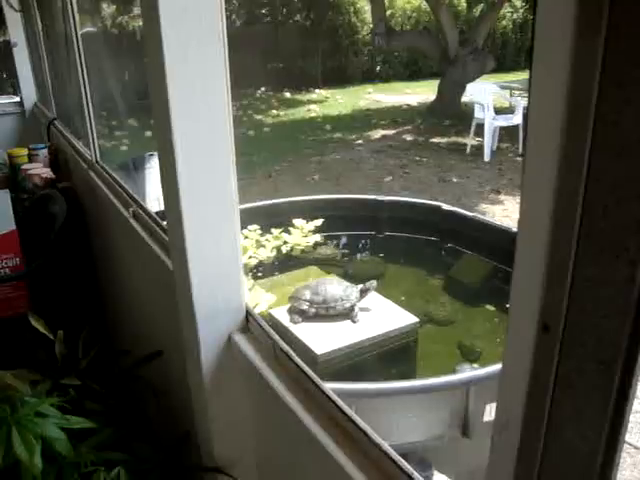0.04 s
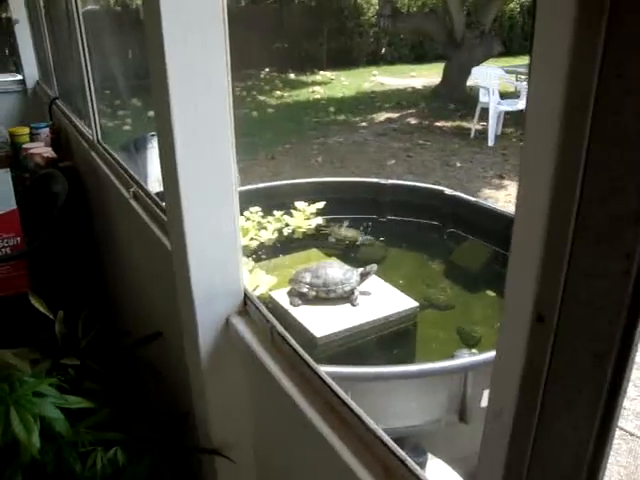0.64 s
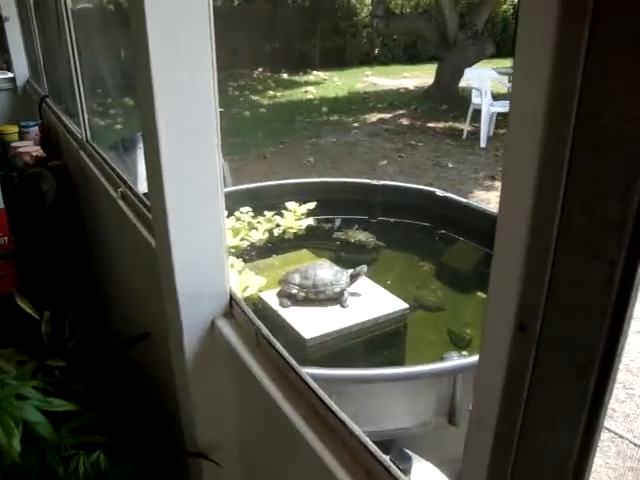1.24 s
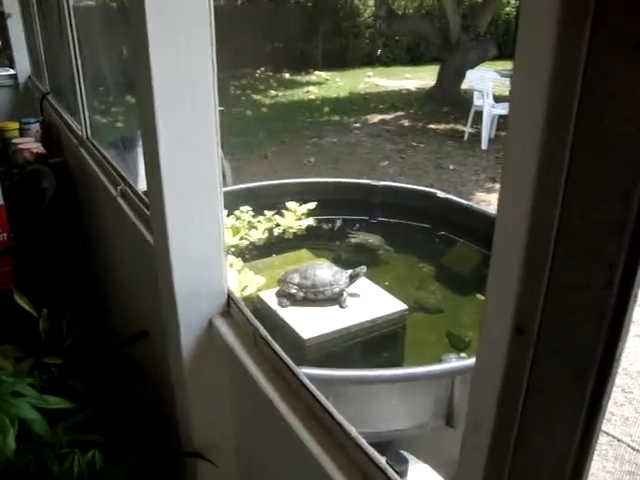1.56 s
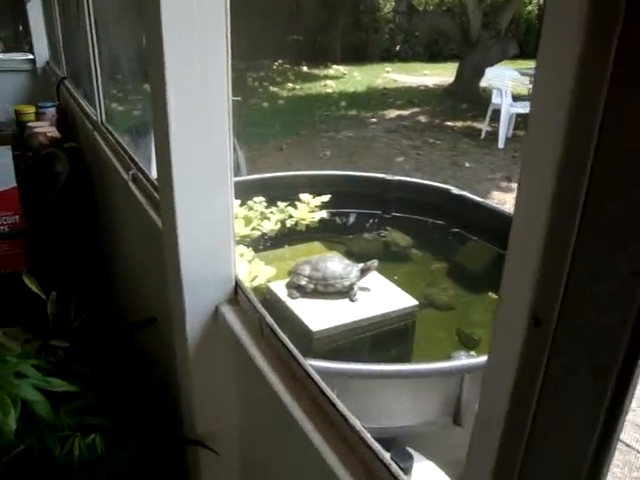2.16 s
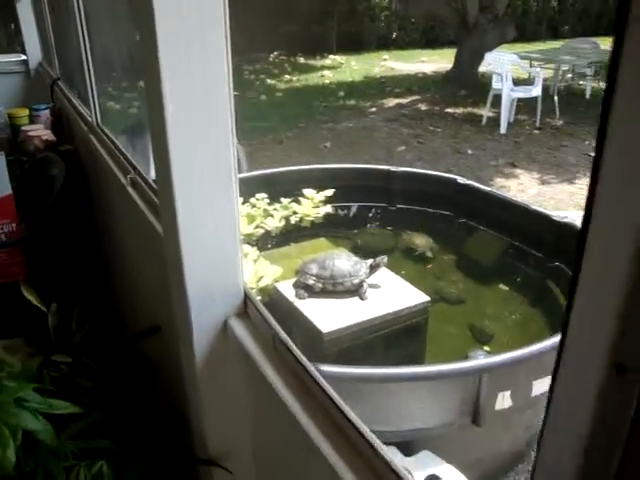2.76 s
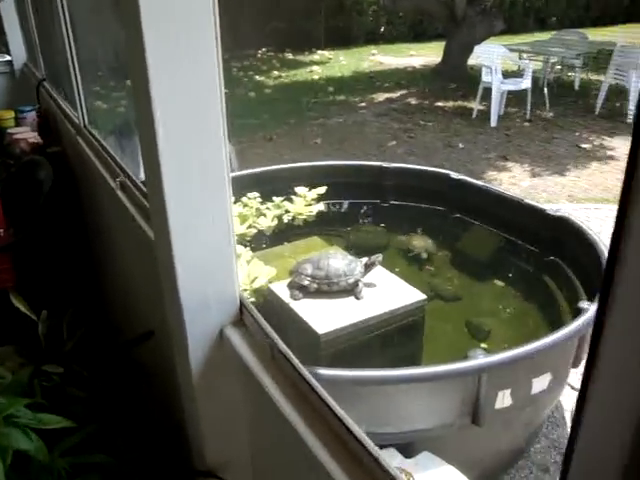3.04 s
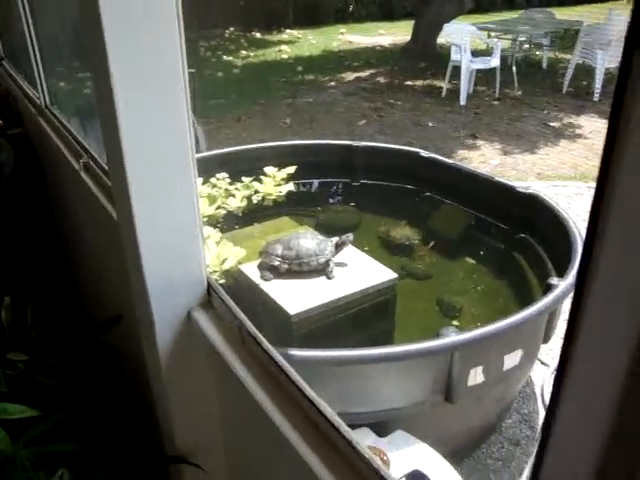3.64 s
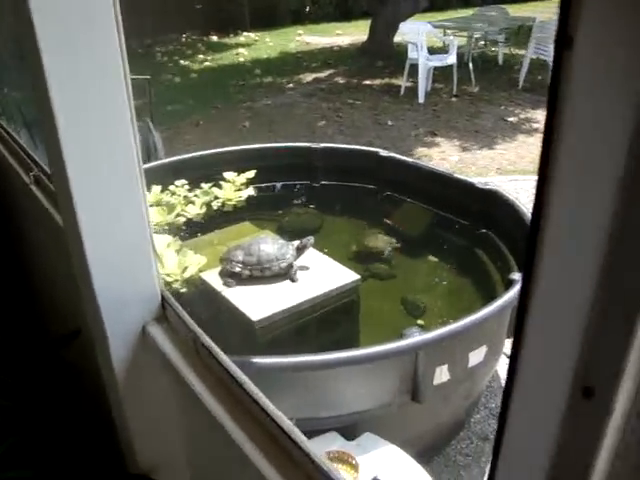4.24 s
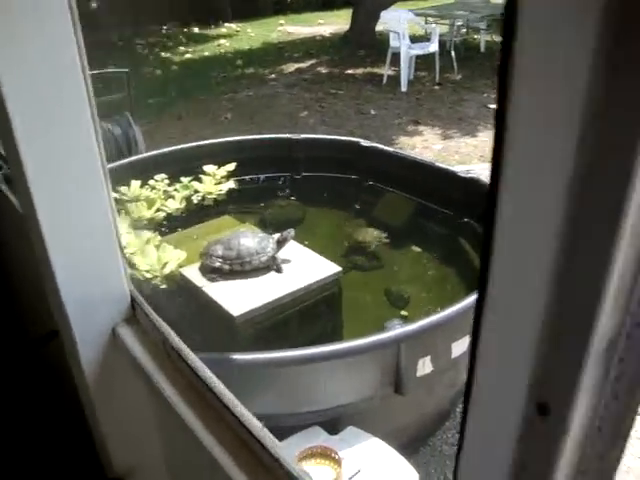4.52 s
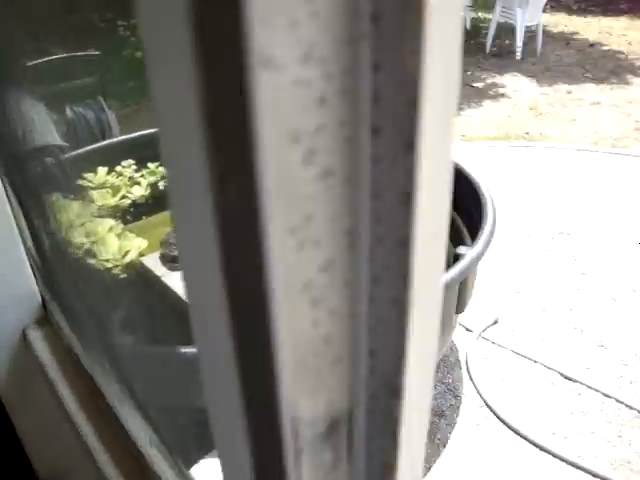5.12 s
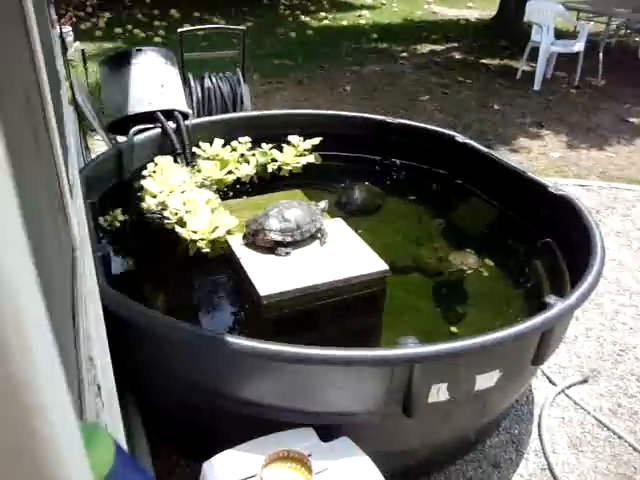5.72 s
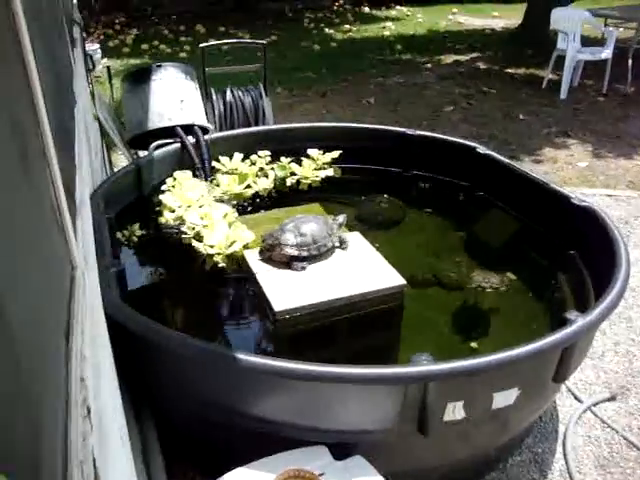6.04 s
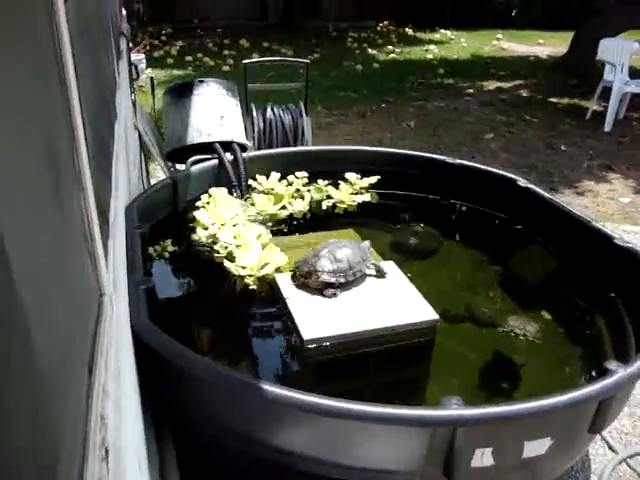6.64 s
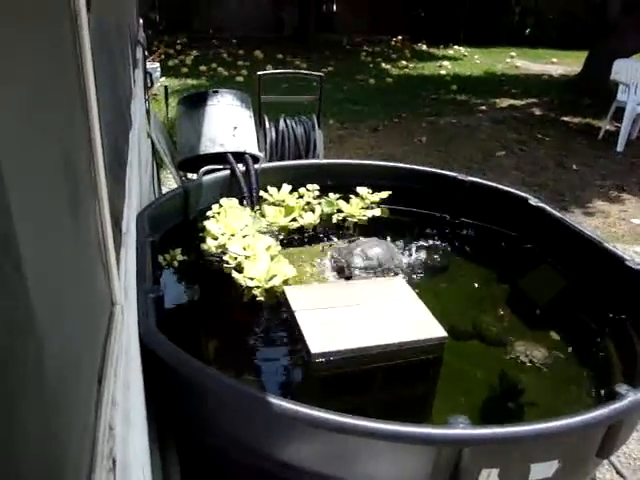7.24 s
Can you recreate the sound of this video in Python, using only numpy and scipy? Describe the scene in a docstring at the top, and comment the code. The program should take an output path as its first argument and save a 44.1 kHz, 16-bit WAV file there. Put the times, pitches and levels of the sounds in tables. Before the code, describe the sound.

Over a faint trickle and handling clicks, a gritty sliding door rolls open and a turtle plops into a tub of water.

```python
"""A low backyard drone and a faint trickle of bubbles in a pond tub run throughout. Close by, a hand rubs on a
plastic case and makes it click. Brief swishes come and go throughout the scene. From 3.4 s to 5 s a sliding
door rolls open: its rollers grind and knock over grit, its panel rumbles, and from 4 s a dry roller squeals.
The case clicks sharply around 6 s. At 6.7 s a turtle scrapes off its slab, the tub booms, and just after 7 s
the shell slaps into the water in spray, bubbles and slosh."""
import sys
import numpy as np
from scipy import signal
from scipy.fft import rfft, irfft, next_fast_len
from scipy.io import wavfile
from scipy.ndimage import uniform_filter1d

SR = 44100
rng = np.random.default_rng(int(sys.argv[2]) if len(sys.argv) > 2 else 0)


def transcribe(u):
    """Save the signal u as a 16-bit wav file named by the first command-line argument.

    u: samples, shape (n,) or (channels, n), limited to [-1, 1]; the rate is SR.
    q: integer samples, one column per channel.
    """
    v = np.clip(np.atleast_2d(u).T, -1, 1)
    q = np.round(v * 32767).astype(np.int16)
    wavfile.write(sys.argv[1], SR, q)


N = 329868
TIME = np.arange(N) / SR


def amp(db):
    """Decibels to gain."""
    return 10 ** (np.asarray(db) / 20)


def unit(x):
    """Scales to rms 1."""
    return x / np.sqrt(np.mean(x ** 2) + 1e-20)


def add(mix, s, sound):
    """Mixes a sound in at time s."""
    part = mix[round(s * SR):][:len(sound)]
    part += sound[:len(part)]


def level(rows):
    """A fader ride through (t/s, level/dB) rows, fading by 100 dB a second beyond them."""
    s, db = np.transpose(rows)
    outside = np.maximum(s[0] - TIME, 0) + np.maximum(TIME - s[-1], 0)
    return amp(np.interp(TIME, s, db) - 100 * outside)


def strokes(rows, attack_s, sag_db_per_s, release_s):
    """Envelope of (t/s, length/s, level/dB) events: each rises, sags, then falls to 1/e in release_s."""
    power, t = np.zeros(N), np.arange(SR) / SR
    for s, length, db in rows:
        shape = np.minimum(t / attack_s, 1) * np.exp(-np.maximum(t - length, 0) / release_s)
        add(power, s, (shape * amp(db - sag_db_per_s * np.minimum(t, length))) ** 2)
    return np.sqrt(power)


def band(x, low_hz, high_hz, order=2):
    """Band-pass."""
    sos = signal.butter(order, [low_hz, min(high_hz, SR * .45)], "band", fs=SR, output="sos")
    return signal.sosfilt(sos, x)


def colour(x, points):
    """An EQ curve through (f/Hz, level/dB) points whose ends fall away steeply; rms 1."""
    size = next_fast_len(N)
    octave = np.log2(np.fft.rfftfreq(size, 1 / SR) + 1)
    hz, db = np.transpose(points)
    beyond = np.maximum(np.log2(hz[0]) - octave, 0) + np.maximum(octave - np.log2(hz[-1]), 0)
    gain = amp(np.interp(octave, np.log2(hz), db) - 180 * beyond)
    return unit(irfft(rfft(x, size) * gain, size)[:N])


def patchy(x, depth_db, width_hz, length_s):
    """Random patches of tone colour come and go; rms 1."""
    hz, t, spectrum = signal.stft(x, SR, nperseg=512, noverlap=384)
    field = rng.standard_normal(spectrum.shape)
    for axis, step in enumerate((hz[1] / width_hz, t[1] / length_s)):
        blur = np.exp(-(2 * np.arange(-30, 31) * step) ** 2)
        field = signal.fftconvolve(field, np.expand_dims(blur, 1 - axis), "same")
    spectrum *= amp(depth_db * np.clip(unit(field), -2, 2))
    return unit(signal.istft(spectrum, SR, nperseg=512, noverlap=384)[1][:N])


def wander(hz):
    """Slow random motion up to a rate, rms 1."""
    f = np.fft.rfftfreq(next_fast_len(N // 32 + 1, True), 32 / SR)
    spectrum = rng.standard_normal(len(f)) + 1j * rng.standard_normal(len(f))
    slow = irfft(spectrum / (1 + (f / hz) ** 4))
    return unit(np.interp(np.arange(N), np.arange(len(slow)) * 32, slow))


def steady(x, size=2200):
    """Holds the rms over size samples near 1 and keeps the fine grain."""
    return x / np.sqrt(abs(uniform_filter1d(x ** 2, size)) + 0.01 * np.mean(x ** 2))


def grains(per_s, spread_db):
    """Random impulses of uneven size."""
    sizes = amp(spread_db * np.minimum(rng.exponential(1, N), 4)) * rng.choice([-1, 1], N)
    return sizes * (rng.random(N) < per_s / SR)


def ring(modes):
    """A struck body's decaying modes (f/Hz, level/dB, t60/s); peak 1."""
    t = np.arange(SR // 8) / SR
    sound = sum(amp(db - 60 * t / t60) * np.sin(2 * np.pi * hz * t) for hz, db, t60 in modes)
    return sound / abs(sound).max()


def soften(sound, rise_s):
    """Rounds off the attack."""
    return sound * (1 - np.exp(-np.arange(len(sound)) / SR / rise_s))


def rebound(sound, delay_s, share):
    """The same blow lands once more, a moment later."""
    return sound + share * np.pad(sound, (round(delay_s * SR), 0))[:len(sound)]


def burst(t60):
    """A dying snap of noise with a peak near 1."""
    t = np.arange(SR // 8) / SR
    return .5 * rng.standard_normal(len(t)) * amp(-60 * t / t60)


def crack(hz, t60, spread):
    """A sharp tick with a noisy tail, centred on a frequency; peak 1."""
    sound = band(burst(t60) + 2 * signal.unit_impulse(SR // 8), hz / spread, hz * spread)
    return sound / abs(sound).max()


def bubble(hz, t60, rise=0.09):
    """A trapped bubble rings and climbs in pitch as it nears the surface."""
    t = np.arange(SR // 6) / SR
    turns = hz * np.cumsum(1 + rise * np.minimum(t / t60, 2)) / SR
    return np.sin(2 * np.pi * turns) * amp(-60 * t / t60) * (1 - np.exp(-t * hz))


def bubbles(low_hz, high_hz, per_s, cycles, spread_db, count=28):
    """A cloud of bubbles of many sizes, rms 1."""
    kicks, out = grains(per_s, spread_db), np.zeros(N)
    shapes = [bubble(hz, cycles / hz) for hz in np.geomspace(low_hz, high_hz, count)]
    which = rng.integers(0, count, N)
    for i in np.flatnonzero(kicks):
        add(out, i / SR, kicks[i] * shapes[which[i]])
    return unit(out)


def wavering(tones, depth, drift_rad, drift_hz):
    """Sines (f/Hz, level/dB) that waver in level and phase."""
    return sum(amp(db) * (1 + depth * wander(8))
               * np.sin(2 * np.pi * hz * TIME + drift_rad * wander(drift_hz)) for hz, db in tones)


# EQ of the drone and of the open air: f/Hz, level/dB
DRONE_EQ = [(15, -67), (25, -42), (86, -37), (123, -15), (189, -8), (220, -8), (261, -5), (327, -5.5),
            (401, 0), (501, -10), (546, -9), (796, -15), (945, -26.5), (1060, -22), (1500, -21),
            (1950, -25), (3300, -120)]
AIR_EQ = [(240, -18), (400, 1), (743, 3), (885, -0.5), (960, 1), (1420, -14.5), (2430, -5), (3550, -25.5),
          (5310, -23), (8620, -18), (10000, -23), (13000, -77), (22000, -120)]
# tones of the drone's hum and of the whine, before their faders: f/Hz, level/dB
HUM_TONES = [(226, -9), (334, -5.5), (414, -7.5)]
WHINE_TONES = [(748, -66.5), (958.5, -60), (1198, -60.5), (1320, -66.5)]
# fader rides of the drone and of the whine: t/s, level/dB
DRONE_FADER = [(0.06, -49), (0.95, -45), (1.3, -50.5), (2.1, -54), (2.9, -54), (3.4, -50), (5.0, -40.5),
               (5.75, -47), (6.7, -48)]
WHINE_FADER = [(0.04, 1.5), (1.8, 1.7), (3.0, -1.3), (7.48, 2.5)]


def yard():
    """The outdoor bed: a humming drone, a faint pump-like whine, airy hiss and a deep rumble."""
    drone = colour(rng.standard_normal(N), DRONE_EQ)
    hum = wavering(HUM_TONES, depth=.6, drift_rad=1.7, drift_hz=6)
    whine = wavering(WHINE_TONES, depth=.3, drift_rad=.7, drift_hz=5) * level(WHINE_FADER)
    air = patchy(colour(rng.standard_normal(N), AIR_EQ), depth_db=2.5, width_hz=940, length_s=0.075)
    air *= amp(-50.5 + 0.7 * wander(5.2))
    rumble = amp(-63.5) * colour(rng.standard_normal(N), [(25, -19.5), (60, -10), (120, 3), (200, -1)])
    return band(drone + hum, 86, 4000) * level(DRONE_FADER) + whine + air + rumble


# foreground drips: t/s, level/dB, bubble f/Hz, splat over bubble/dB
DRIPS = [(0.815, -38, 1114, -2), (0.978, -39, 1564, 8.5), (1.121, -36.5, 1820, 5.5), (1.18, -39, 1135, -15),
         (1.42, -40, 1116, -16), (1.633, -41, 750, 2), (1.671, -39.5, 690, 2), (1.926, -35.5, 775, -6),
         (1.972, -37, 683, -2), (2.009, -39, 1080, -8), (2.05, -35.5, 733, -13), (2.22, -39, 1090, -12),
         (2.284, -42.5, 1330, 7.5), (2.391, -38.5, 696, -8), (2.585, -37.5, 730, -10), (2.69, -40, 730, -5),
         (2.777, -40, 1350, 0), (2.951, -33.5, 700, -10), (3.177, -35, 650, -5), (3.271, -42, 1400, 5.5),
         (3.37, -38, 1234, 6), (6.671, -30, 950, -1)]


def trickle():
    """Water dribbles into the tub: many faint bubbles and a few clear drips that plink or splat."""
    out = amp(-59) * bubbles(625, 2040, per_s=80, cycles=30, spread_db=2)
    for s, db, hz, splat_db in DRIPS:
        add(out, s, amp(db) * bubble(hz, t60=0.07, rise=0.07))
        add(out, s, amp(db + splat_db) * crack(hz, t60=.07, spread=1.2))
    return out


# EQ of rubbing skin: f/Hz, level/dB
SKIN_EQ = [(500, -18.5), (900, -6.5), (1300, -0.5), (2100, -3.5), (3100, -1), (4300, -4), (6000, -6),
           (8200, -13), (10000, -20.5)]
# strokes of the hand: t/s, length/s, rub level/dB, fizz level/dB
RUBS = [(0.636, 0.11, -52.5, -55.5), (0.88, 0.13, -48, -53.5), (1.08, 0.1, -48.5, -57),
        (1.278, 0.23, -49, -60), (1.589, 0.077, -47.5, -77), (1.783, 0.15, -47, -75),
        (2.03, 0.26, -53, -66), (2.4, 0.13, -49.5, -79), (2.524, 0.14, -48, -53), (2.926, 0.12, -57, -54),
        (3.182, 0.043, -48.5, -75), (4.996, 0.0088, -57, -52), (5.18, 0.086, -49, -51),
        (5.395, 0.23, -41, -65), (5.81, 0.078, -47.5, -64), (5.998, 0.012, -37.5, -68),
        (6.15, 0.05, -42, -72), (6.254, 0.073, -40.5, -80), (6.407, 0.01, -38.5, -70),
        (6.514, 0.27, -49, -72)]


def hand_rustle():
    """Skin rubs on plastic in tiny slips with a dry fizz on top; even the resting grip stirs."""
    starts, lengths, rub_db, fizz_db = np.transpose(RUBS)
    slips = colour(grains(2200, spread_db=2.5) * amp(2 * wander(70)), SKIN_EQ)
    slips = patchy(slips, depth_db=3.5, width_hz=270, length_s=0.023)
    grip = patchy(colour(grains(9000, spread_db=2), SKIN_EQ), depth_db=4, width_hz=450, length_s=.03)
    fizz = patchy(band(grains(9000, spread_db=2), 5500, 9300), depth_db=3, width_hz=700, length_s=.02)
    out = steady(grip) * amp(-50.5 + 1.6 * wander(27))
    for texture, db in [(slips, rub_db), (fizz, fizz_db)]:
        press = strokes(zip(starts, lengths, db), attack_s=0.0071, sag_db_per_s=7.5, release_s=0.034)
        out += steady(texture) * press
    return out


# ring of the plastic case: f/Hz, level/dB, t60/s
CASE_MODES = [(1160, -4.5, 0.0062), (1660, -3, 0.0081), (2260, -7, 0.0039), (2625, 5.5, 0.0085),
              (3640, -7, 0.0067), (4330, -12, 0.0095)]
# click cues: t/s, level/dB, then trims for low mode/dB, snap/dB, bump/dB
CLICKS = [(.196, -27.5, 6, 5.5, -45), (0.2189, -12, 9, -2, -57), (.352, -20.5, -15, -1, -53),
          (0.681, -23, -12, -4, -53), (5.9626, 3.5, -1.5, -12.5, -41), (6.0104, -22, -6, 8, -50),
          (6.197, -23, -10, -6, -52), (6.259, -26.5, -10, 9.5, -45), (6.286, -20, -5, 3, -52),
          (6.2957, -12, 4, -1, -49), (6.308, -19, -3, -5, -52), (6.338, -27, -8, 5, -52),
          (6.3837, 4, 10, -12, -35), (6.4024, -21, -5, 13.5, -50)]


def case_clicks():
    """The pressed case clicks: a quick double ring, a snap and a low bump as its whole body jolts."""
    out = np.zeros(N)
    for s, db, low_db, snap_db, bump_db in CLICKS:
        case = ring([(hz, mode_db + low_db * (hz < 1400), t60) for hz, mode_db, t60 in CASE_MODES])
        case = rebound(soften(case, rise_s=.0005), delay_s=.00186, share=.35)
        snap = amp(snap_db) * band(burst(t60=.006), 700, 6500)
        bump = amp(bump_db) * ring([(70, -31, .04), (203, 7, 0.026)])
        add(out, s, amp(db) * (band(case + snap, 300, 12000, order=1) + bump))
    return out


# swish cues: t/s, length/s, level/dB, starting centre f/Hz, width/Hz, glide/ratio of end to start
SWISHES = [(1.071, 0.087, -45, 4350, 400, 1.15), (1.368, 0.057, -43.5, 2676, 500, 1.11),
           (1.413, 0.053, -44, 4300, 400, 0.99), (1.845, 0.1, -46.5, 2770, 700, 0.97),
           (3.169, 0.095, -47, 4250, 700, 1.15), (3.426, 0.035, -44, 2780, 800, 0.34),
           (3.652, 0.019, -35, 9400, 1400, 0.87), (4.175, 0.048, -29, 6080, 900, 0.94),
           (4.265, 0.067, -26, 5610, 905, 1.14), (4.557, 0.063, -32.5, 5650, 400, 1.04),
           (5.013, 0.074, -41, 1297, 810, 2.4), (5.397, 0.043, -39, 996, 250, 0.9),
           (5.399, 0.011, -37.5, 1840, 1200, 1.26), (5.413, 0.015, -36.5, 5370, 1200, 0.94),
           (5.476, 0.048, -36, 3040, 250, 1.08), (5.807, 0.019, -39, 4180, 3020, 1.7),
           (6.167, 0.053, -41.5, 3950, 900, 1.24), (6.187, 0.046, -39, 2885, 900, 0.67),
           (6.411, 0.017, -37.5, 8300, 1500, 0.95), (6.537, 0.027, -43.5, 4320, 800, 1.05),
           (6.718, 0.029, -32.5, 8200, 4200, 0.94), (6.756, 0.0084, -30, 4130, 700, 1.06),
           (7.045, 0.069, -35.5, 3790, 900, 0.74)]


def swishes():
    """Short bands of friction noise that glide in pitch."""
    out, f = np.zeros(N), np.fft.rfftfreq(SR // 4, 1 / SR)
    for s, length, db, hz, width, glide in SWISHES:
        window = signal.windows.tukey(int(length * SR), .7)
        spectra = rfft(rng.standard_normal((2, SR // 4))) / (1 + (2 * f / width) ** 2)
        a, b = irfft(spectra)[:, :len(window)]  # two dark noises, shifted up to the gliding centre
        angle = 2 * np.pi * np.cumsum(np.linspace(hz, hz * glide, len(a))) / SR
        add(out, s, amp(db) * unit(a * np.cos(angle) + b * np.sin(angle)) * window)
    return out


# the push on the door (slow start, shove, coast to rest): t/s, level/dB relative to full speed
PUSH = [(3.35, -60), (3.38, -24.5), (3.55, -35), (3.62, -21), (3.85, -13), (3.93, -7.5), (4.12, -11),
        (4.32, -6.5), (4.42, 1), (4.5, -4), (4.7, -3), (4.75, -10.5), (4.81, -13.5), (4.9, -12.5),
        (5.02, -35)]
# EQ of the grinding rollers, the rumbling panel and the dull drag on the track: f/Hz, level/dB
GRIND_EQ = [(400, -21), (550, -33), (700, -8.5), (1000, 3), (1250, 2.5), (1600, -3.5), (2200, 0.5),
            (2900, -9), (3500, -7.5), (4400, -1), (5000, -5.5), (6000, -4.5), (8000, -10), (10000, -18)]
PANEL_EQ = [(35, -68), (60, -26), (86, -42), (181, -15.5), (216, -34), (259, -1.5), (383, -5), (427, 0.5),
            (578, -7.5), (702, -6.5), (800, -12), (1040, -31), (1760, -120)]
DRAG_EQ = [(760, -13), (950, -1), (1150, -7.5), (1650, -3), (2200, -6), (2800, -15)]
# fader ride of the drag as the door gets going: t/s, level/dB
DRAG_FADER = [(3.59, -47), (3.66, -42), (3.69, -59), (3.725, -39), (3.8, -52), (3.85, -60), (3.89, -42),
              (4.0, -38), (4.08, -57), (4.13, -49)]
TRACK_HZ, TRACK_WIDTH_HZ = 947, 66


def door():
    """Rollers crunch and drag along an uneven track, make it sing, shake the panel and hit grit."""
    effort = level(PUSH) * amp(1.3 * wander(13))
    gentle = np.sqrt(effort)  # layers on this curve stand out while the door is slow
    crunch = colour(grains(5000, spread_db=2.8) * amp(2.4 * wander(110)), GRIND_EQ)
    crunch = patchy(crunch, depth_db=2.6, width_hz=700, length_s=0.012)
    grind = amp(-24.5) * effort * steady(crunch, size=1300)
    panel = amp(-31.5) * effort * steady(colour(rng.standard_normal(N), PANEL_EQ), size=1300)
    sway = amp(-47.5) * gentle * unit(band(rng.standard_normal(N), 162, 316, order=3))
    drag = colour(grains(1200, spread_db=-0.5) * amp(1.3 * wander(60)), DRAG_EQ)
    drag = level(DRAG_FADER) * steady(drag)
    low_hz, high_hz = TRACK_HZ - TRACK_WIDTH_HZ / 2, TRACK_HZ + TRACK_WIDTH_HZ / 2
    track = band(grains(900, spread_db=2), low_hz, high_hz, order=1)
    track = amp(-42.5) * gentle * steady(track, size=6000)
    return grind + panel + sway + drag + track + grit(gentle)


# ring of the door frame: f/Hz, level/dB, t60/s
FRAME_MODES = [(948, -10.5, 0.031), (1707, -5, 0.014), (2297, 1, 0.0094), (2920, 6, 0.0083),
               (3440, 1, 0.0069), (4290, -7.5, 0.018), (5500, -4, .012)]
# knocks over coarse grit: t/s, level/dB, pitch/ratio, low-mode trim/dB
GRIT_KNOCKS = [(3.441, -28, .7, -3), (3.4825, -33, 0.88, -4), (3.503, -19, 0.78, 1), (3.596, -18, 0.94, -1),
               (3.609, -26, .8, 3), (3.634, -28, 0.97, 0), (3.651, -25, .72, -2), (3.663, -30, 0.91, 0),
               (3.696, -27, 0.95, -5), (3.711, -28, 0.73, -7), (3.717, -22, 0.89, -3),
               (3.737, -13.5, 1.06, -6), (3.78, -20, 0.93, -2), (3.789, -21, 0.83, 6),
               (3.823, -18, 1.1, -3), (3.8547, -29, 1.3, -5), (3.8695, -11.5, 0.98, -9),
               (3.883, -18, 0.97, 6), (3.895, -10.5, 1.06, -2), (3.9198, -11, 1.13, -2),
               (3.932, -17, 1.15, -7), (3.946, -20, 1.1, -2), (3.991, -19, 0.51, 11), (4.076, -23, 0.9, 21),
               (4.083, -23, 1.06, 26), (4.16, -19.5, 0.93, 4), (4.191, -24, 0.83, 1),
               (4.225, -10, 1.02, -0.5), (4.237, -14, 1.16, -6), (4.328, -9.5, 0.96, -18),
               (4.788, -13.5, 1.08, -3), (4.797, -13, 1.1, -5)]


def grit(tick_gain):
    """Grit under the rollers rings the frame: a chatter of fine ticks and single crunchy knocks."""
    ticks = signal.oaconvolve(grains(110, spread_db=1.5), ring(FRAME_MODES))[:N]
    out = amp(-36) * tick_gain * steady(ticks, size=6000)
    for s, db, pitch, low_db in GRIT_KNOCKS:
        modes = [(hz * pitch, mode_db + low_db * (hz < 1300), t60) for hz, mode_db, t60 in FRAME_MODES]
        knock = soften(ring(modes) + .3 * burst(t60=0.017), rise_s=.0007)  # crushes rather than snaps
        knock /= abs(knock).max()
        add(out, s, amp(db) * rebound(knock, delay_s=rng.uniform(0.00232, 0.0042), share=0.34))
    return band(out, 540, 5000)


# squeal cues: peak t/s, length/s, f/Hz, then level/dB of fundamental, octave and twelfth
SQUEALS = [(4.001, 0.055, 2124, -54, -36, -62), (4.177, 0.085, 2120, -41.5, -37.5, -39.5),
           (4.287, 0.048, 2068, -23.5, -31, -33), (4.317, 0.025, 2035, -31, -31.5, -45),
           (4.357, 0.048, 2017, -32.5, -27.5, -34), (4.418, 0.053, 2062, -33, -33.5, -45),
           (4.533, 0.11, 2060, -46, -28.5, -40.5), (4.691, 0.033, 2056, -20, -46, -42),
           (4.736, 0.033, 1990, -38, -32, -55), (4.794, 0.046, 1985, -39.5, -36.5, -55)]
SQUEAL_PITCH_JITTER, SQUEAL_FLUTTER_DB = .008, 2.2


def roller_squeal():
    """A dry roller sticks and slips: three shaky harmonics that swell and fade with each squeal."""
    s, length, hz, *partial_db = np.transpose(SQUEALS)
    pitch = np.interp(TIME, s, hz) * (1 + SQUEAL_PITCH_JITTER * wander(200))
    turns = np.cumsum(pitch) / SR
    swells = (1 + (2 * (TIME[:, None] - s) / length) ** 2 / 2) ** -2
    out = np.zeros(N)
    for k, db in enumerate(partial_db, 1):
        flutter = amp(SQUEAL_FLUTTER_DB * wander(90))
        partial = steady(flutter * np.sin(2 * np.pi * k * turns + .55 * wander(130)))
        out += swells @ amp(db) * partial
    return out


# EQ shared by the scrapes and the splash's spray: f/Hz, level/dB
SCRAPE_SPRAY_EQ = [(700, -18), (1100, 1.5), (1500, 1), (2200, -4), (3000, 1.5), (4000, -0.5), (5200, -4.5),
                   (7000, -9), (8500, -13.5), (10000, -18)]
# scrapes over the slab: t/s, length/s, level/dB
SCRAPES = [(6.72, 0.048, -37.5), (6.803, 0.037, -40), (6.858, 0.038, -40), (6.92, 0.13, -38.5),
           (7.1, 0.05, -51)]


def slab_scrapes():
    """The turtle's claws and shell drag over the slab in short, grainy strokes."""
    scratch = colour(grains(900, spread_db=3), SCRAPE_SPRAY_EQ)
    scratch = steady(patchy(scratch, depth_db=4, width_hz=700, length_s=.01))
    return scratch * strokes(SCRAPES, attack_s=.018, sag_db_per_s=20, release_s=0.026)


# splash cues: t/s, length/s, then level/dB of spray, froth and slosh
SPLASHES = [(6.743, 0.011, -49, -34, -43.5), (6.919, 0.059, -64, -39.5, -40),
            (7.058, 0.066, -38, -40, -40.5), (7.154, 0.028, -29.5, -41, -60),
            (7.193, 0.016, -29, -35.5, -43), (7.24, 0.028, -32, -44, -58), (7.288, 0.018, -30, -35, -46),
            (7.314, 0.049, -54, -29.5, -34), (7.382, 0.063, -34, -27, -37), (7.455, .04, -29, -37, -47)]


def splashes():
    """Feet dip, the shell goes in and throws spray, the cavity closes in bubbles, water falls back."""
    spray = colour(grains(6000, spread_db=3) * amp(1.6 * wander(70)), SCRAPE_SPRAY_EQ)
    spray = steady(patchy(spray, depth_db=3.5, width_hz=450, length_s=.014))
    droplets = amp(-6.5) * steady(bubbles(1800, 5000, per_s=350, cycles=34, spread_db=3))
    froth = steady(bubbles(620, 2500, per_s=800, cycles=21, spread_db=2.3, count=60), size=1300)
    slosh = steady(bubbles(245, 560, per_s=600, cycles=8, spread_db=2), size=900)
    starts, lengths, spray_db, froth_db, slosh_db = np.transpose(SPLASHES)
    layers = [(spray + droplets, spray_db, 0.065), (froth, froth_db, 0.029), (slosh, slosh_db, 0.11)]
    return sum(water * strokes(zip(starts, lengths, db), attack_s=0.008, sag_db_per_s=38, release_s=fall)
               for water, db, fall in layers)


# thuds on the tub: t/s, level/dB, pitch/ratio
THUDS = [(6.755, -29, 1.02), (7.217, -29, 1.03), (7.257, -41, .55)]


def tub_thuds():
    """The tub booms in three low modes as the turtle shoves off and lands."""
    out = np.zeros(N)
    for s, db, pitch in THUDS:
        modes = [(90 * pitch, -16, .06), (160 * pitch, -3, 0.1), (212 * pitch, 8, 0.1)]
        add(out, s, amp(db) * ring(modes))
    return out


# claw cues: t/s, level/dB, centre f/Hz
CLAWS = [(6.7572, -20, 4170), (6.807, -28, 4530), (6.8235, -20.5, 4800), (6.829, -27, 7500),
         (6.8536, -25, 4770), (6.9257, -26, 2800), (6.932, -26, 2690), (6.949, -35, 2600),
         (6.9582, -22, 1410), (6.9665, -31, 6750), (6.978, -25, 6360), (6.9972, -25, 3320),
         (7.0626, -23, 3450), (7.112, -30, 4000), (7.129, -26.5, 1430)]


def claw_ticks():
    """Claws strike the slab in small, bright ticks."""
    out = np.zeros(N)
    for s, db, hz in CLAWS:
        add(out, s, amp(db) * crack(hz, t60=.022, spread=1.3))
    return out


# plop cues: t/s, level/dB, f/Hz, t60/s
PLOPS = [(6.885, -30.5, 538, 0.074), (6.929, -33, 640, .06), (6.936, -30, 922, 0.14),
         (6.972, -30, 328, 0.07), (7.047, -17, 293, 0.027), (7.128, -25, 310, 0.071),
         (7.135, -25, 800, 0.048), (7.137, -25, 960, 0.081), (7.166, -23.5, 900, 0.093),
         (7.168, -21, 1540, 0.055), (7.209, -16, 1580, 0.027), (7.297, -20, 1530, 0.024),
         (7.308, -20, 1370, 0.044), (7.322, -17.5, 660, 0.025), (7.343, -12.5, 905, 0.022),
         (7.346, -18.5, 284, 0.064), (7.353, -15, 788, 0.051), (7.368, -14, 873, 0.036),
         (7.38, -20.5, 1410, 0.053), (7.408, -20, 650, 0.037), (7.413, -24, 756, 0.046),
         (7.419, -18, 874, 0.037), (7.458, -15, 2950, 0.025), (7.466, -19, 1660, 0.039)]


def plops():
    """Large bubbles ring out, each with a rising note."""
    out = np.zeros(N)
    for s, db, hz, t60 in PLOPS:
        add(out, s, amp(db) * bubble(hz, t60))
    return out


# slap cues: t/s, level/dB, centre f/Hz
SLAPS = [(7.144, -16.5, 3380), (7.148, -18.5, 3480), (7.169, -16.5, 2060), (7.192, -15, 2180),
         (7.206, -11, 3320), (7.208, -22, 2200), (7.2099, -14, 1840), (7.2174, -10, 3300),
         (7.2226, -10, 3860), (7.2269, -10.5, 2500), (7.3185, -19, 2400), (7.3297, -18, 2270),
         (7.38, -19, 1500), (7.403, -19, 2500), (7.4361, -10.5, 1750)]


def shell_slaps():
    """Shell and water meet in tight, hard cracks."""
    out = np.zeros(N)
    for s, db, hz in SLAPS:
        add(out, s, amp(db) * crack(hz, t60=.014, spread=1.45))
    return out


def doorway_echo(x, t60=0.29):
    """Short scatter from the door frame and the house wall."""
    t = np.arange(SR // 3) / SR
    reflections = rng.standard_normal(len(t)) * (rng.random(len(t)) < 2000 / SR)
    tail = reflections * (t > .004) * amp(-60 * t / t60)
    return signal.oaconvolve(x, tail / np.linalg.norm(tail))[:N]


def scene():
    """The mix: pond and door with their reflections; yard, hand and swishes dry."""
    turtle = band(slab_scrapes() + splashes() + tub_thuds() + plops(), 65, 21000, order=1)
    turtle += claw_ticks() + shell_slaps()
    outside = trickle() + door() + roller_squeal() + turtle
    close = hand_rustle() + case_clicks() + swishes()
    return (yard() + close + outside + amp(-9) * doorway_echo(outside))[None]


def record(dry, cutoff_hz=10130):
    """The master: 40 ms of silence, 3 ms fades at both ends and a steep high cut."""
    fades = np.clip(np.minimum(TIME - .04, TIME[-1] - TIME) / .003, 0, 1)
    high_cut = signal.firwin(801, cutoff_hz, window=("kaiser", 9), fs=SR)
    return signal.oaconvolve(dry * fades, high_cut[None], "same")


dry = scene()
out = record(dry)
transcribe(out)
```